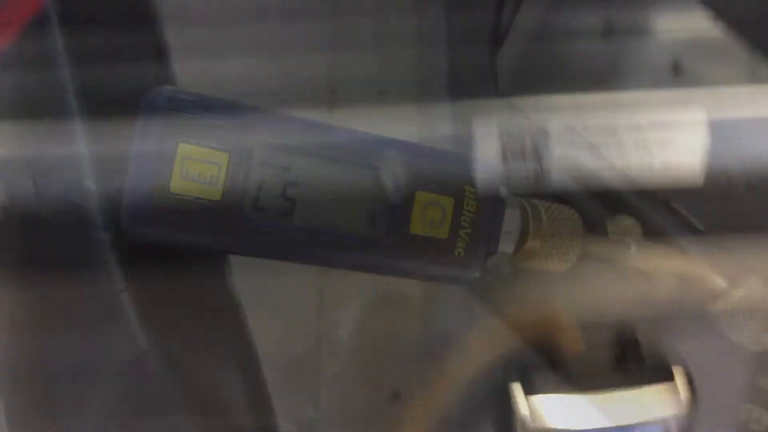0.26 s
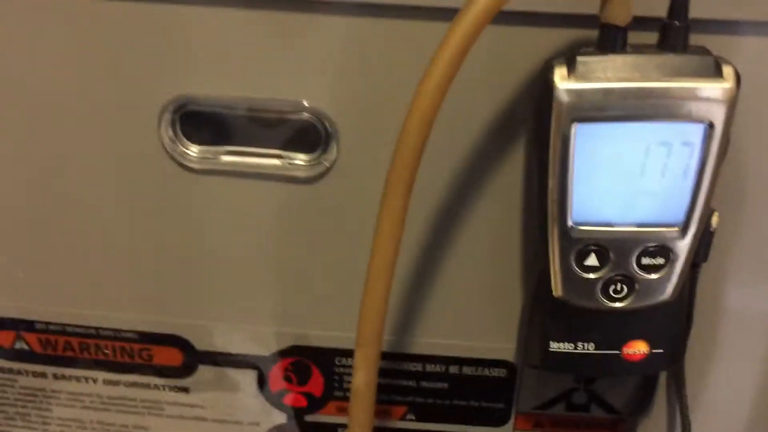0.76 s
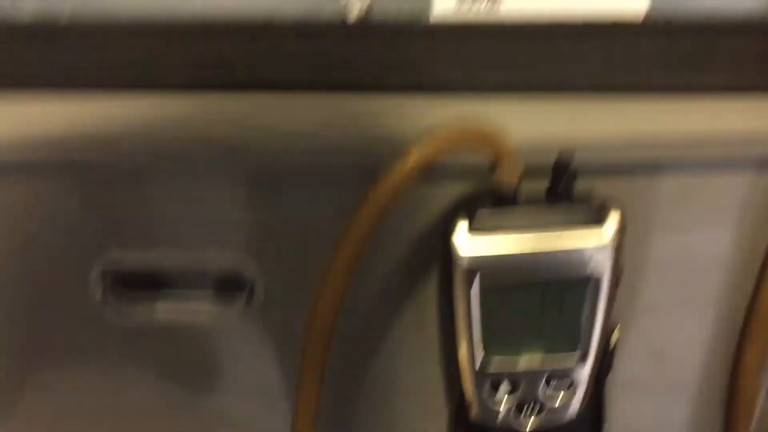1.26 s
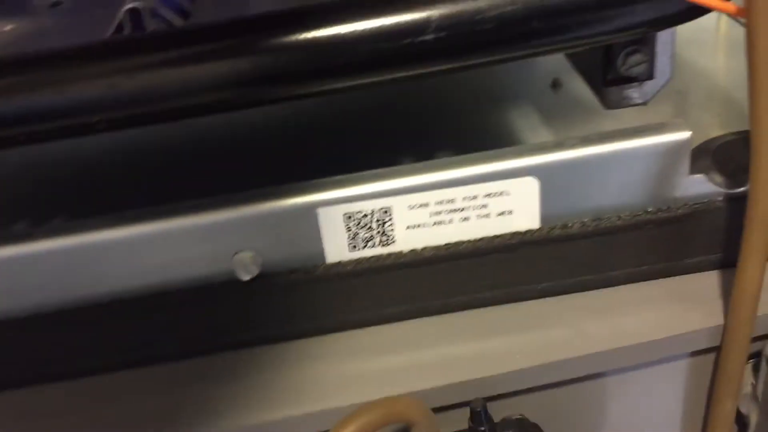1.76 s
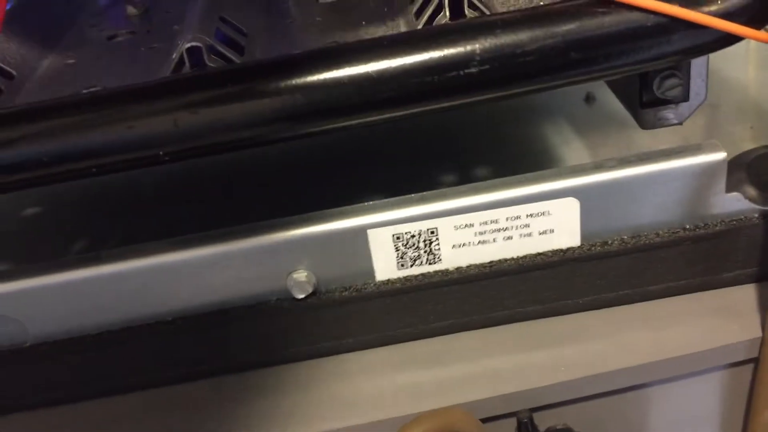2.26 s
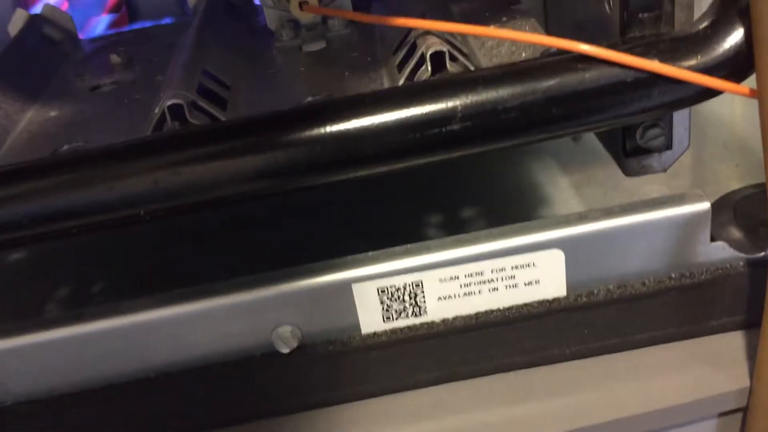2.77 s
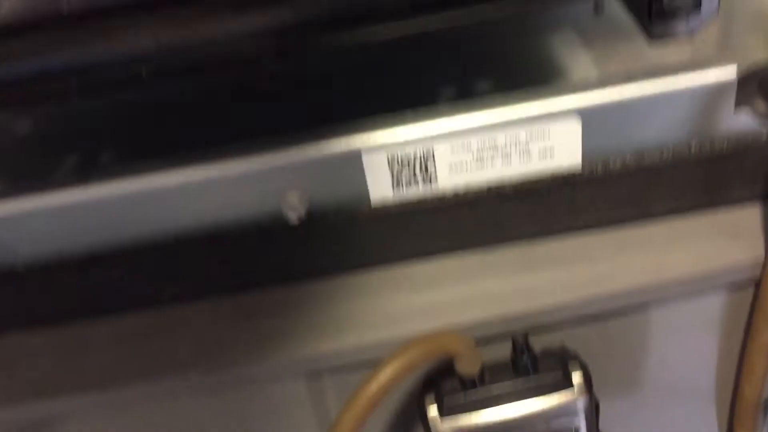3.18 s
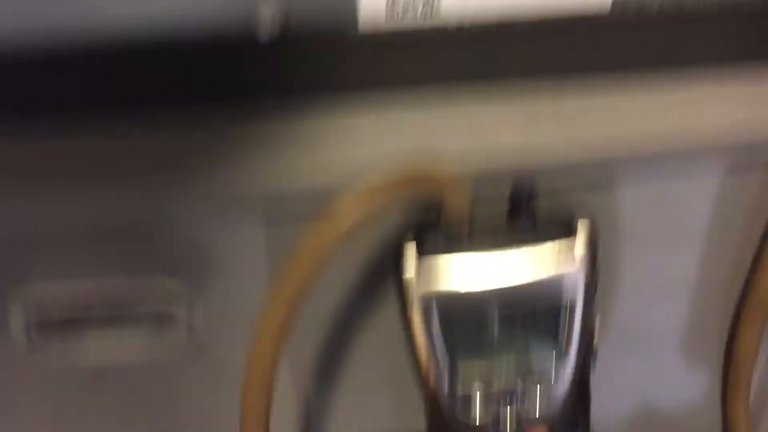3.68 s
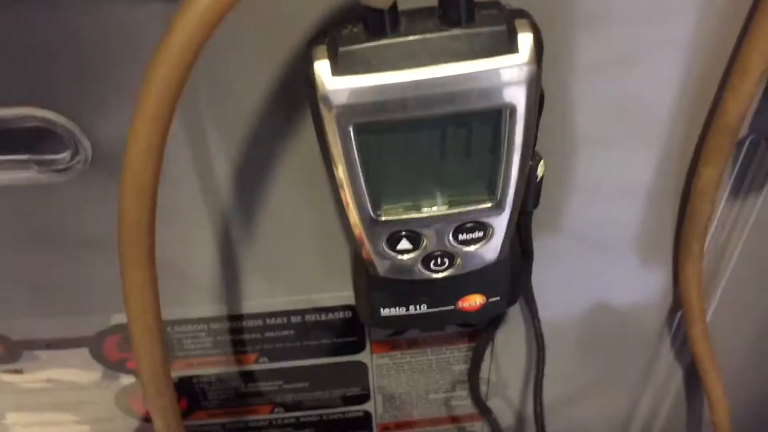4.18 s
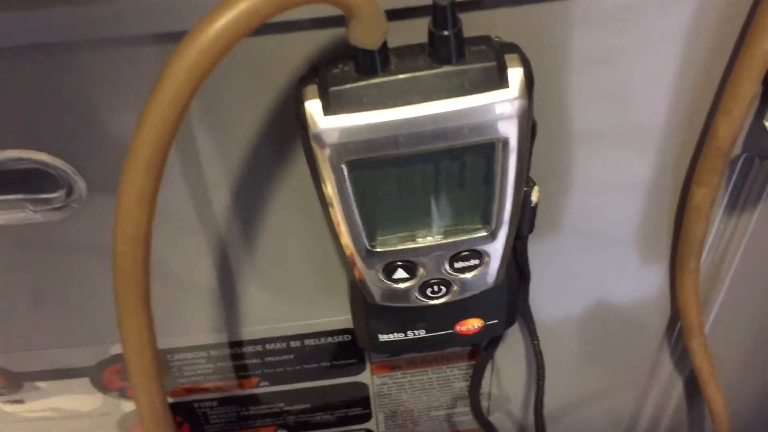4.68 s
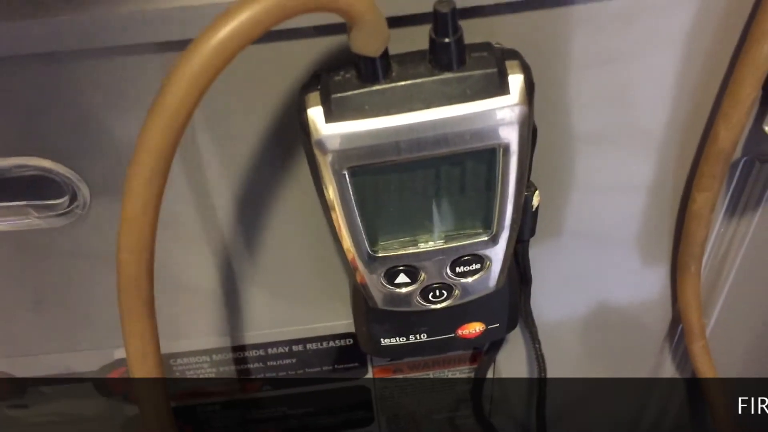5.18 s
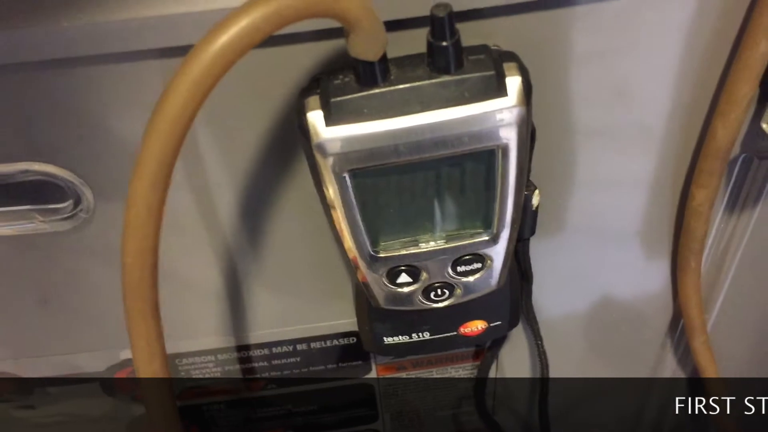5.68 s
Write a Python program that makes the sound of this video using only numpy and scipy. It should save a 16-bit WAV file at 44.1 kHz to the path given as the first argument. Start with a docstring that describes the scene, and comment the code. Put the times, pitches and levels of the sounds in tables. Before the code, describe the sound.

A brief broad machine rush with faint whines fades in under half a second into a running gas furnace. Low flame rumble, duct air, steady thin motor tones and gas hiss continue in a small room. The hand-held phone moves, so the hiss swells and recedes; tiny ticks occur, then sharp plastic taps rattle close by near the end.

```python
"""First a broad rush with a few whines dies away in under half a second while a gas furnace comes up.
In a small room, a hand-held phone moves along the cabinet: nearer the open burner box, more gas hiss.
Shaped noise makes the flame roar, boom, panels, duct air and jets; drifting sines make the draught motor.
Close by, decaying modes ring a tapped plastic gauge and short noise bursts make ticks and scuffs."""
import sys
import numpy as np
from scipy import signal
from scipy.fft import rfft, irfft, next_fast_len
from scipy.io import wavfile
from scipy.ndimage import uniform_filter1d, map_coordinates

SR = 44100
rng = np.random.default_rng(int(sys.argv[2]) if len(sys.argv) > 2 else 0)


def master_out(mix):
    """Clip the mix to full scale and print it as 16-bit PCM to the path in sys.argv[1]."""
    frames = np.transpose(np.atleast_2d(mix))
    ceiling = np.clip(frames, -1, 1)
    pcm = np.round(ceiling * 32767).astype(np.int16)
    wavfile.write(sys.argv[1], SR, pcm)


N = 261689  # length [samples]


def amp(db):
    """Gain of a level in dB."""
    return 10 ** (np.asarray(db) / 20)


def unit(x):
    """x at rms 1."""
    return x / np.sqrt(np.mean(x ** 2) + 1e-20)


def along(points, hz):
    """Value at hz, from (frequency, value) points on a log axis."""
    f, v = np.transpose(points)
    return np.interp(np.log(hz + 1), np.log(f + 1), v)


def curves(rows):
    """One value per sample for each column after the time."""
    s, *cols = np.transpose(rows)
    return [np.interp(np.arange(N) / SR, s, c) for c in cols]


def ramp(start_s, length_s):
    """0 before start, 1 after start + length."""
    return np.clip((np.arange(N) / SR - start_s) / length_s, 0, 1)


def wobble(rate):
    """A smooth random curve, rate knots a second."""
    knots = rng.standard_normal(int(N * rate / SR) + 4)
    return map_coordinates(knots, [np.arange(N) * rate / SR])


def filtered(x, response):
    """x times a response of frequency."""
    m = next_fast_len(len(x) + 8192)
    return irfft(rfft(x, m) * response(np.fft.rfftfreq(m, 1 / SR)), m)[:len(x)]


def lifts(peaks, hz):
    """Resonances as bell-shaped lifts in dB."""
    return sum(db / (1 + (2 * (hz - c) / w) ** 2) for c, w, db in peaks)


def resonant(modes):
    """Gain of steep-sided resonances side by side."""
    def gain(f):
        return np.sqrt(sum(amp(2 * db) / (1 + (2 * (f - c) / w) ** 2) ** 1.87 for c, w, db in modes))
    return gain


def smooth_field(shape, bins, frames):
    """Random values smoothed over frequency bins and time frames, at rms 1."""
    across = uniform_filter1d(rng.standard_normal(shape), size=bins, axis=0)
    return unit(uniform_filter1d(across, size=frames, axis=1))


def rush(gain, patchy_db, comb_db=4.0):
    """Noise of rms 1 coloured by gain(Hz), with brief patches and a fine, slowly shifting comb of room echoes."""
    z = signal.stft(rng.standard_normal(N), nperseg=1024)[2]
    patches = smooth_field(z.shape, bins=10, frames=6)
    comb = smooth_field(z.shape, bins=2, frames=90)
    field = amp(patchy_db * patches + comb_db * comb)
    return unit(filtered(signal.istft(z * field, nperseg=1024)[1][:N], gain))


def tone(hz, waver_hz):
    """A sine of rms 1 whose pitch drifts a little."""
    cycles = np.cumsum(hz + waver_hz * wobble(6.06)) / SR
    return np.sqrt(2) * np.sin(2 * np.pi * (cycles + rng.random()))


# Closeness of the phone to the open burner box as it pans: (time [s], closeness [0-1])
FACING = [(0, 0.74), (.4, 0.82), (.65, 0.02), (1.05, 0.32), (1.6, 0.97), (2.5, 0.86), (3.55, 0.91),
          (4.1, 0.25), (4.6, 0.55), (5.93, 0.25)]
THINS_S, THINNING_S = 5.08, 0.12  # the bass thins and the middle comes forward: start, length


def heard(far_db, close_db, thin_db):
    """Level of a layer: far from the burner, plus the gain close to it, plus the change once the bass thins."""
    return far_db + close_db * curves(FACING)[0] + thin_db * ramp(THINS_S, THINNING_S)


# Firebox resonances: (frequency [Hz], width [Hz], relative level [dB])
FIREBOX = [(132.1, 12.2, 0.5), (159.6, 27.6, -7)]
# Flame roar at the microphone: (time [s], level [dB])
ROAR = [(0, -45), (.6, -43), (1.4, -42), (1.96, -36.5), (2.4, -44.5), (3.3, -38), (4.3, -41), (4.75, -37.5),
        (5.1, -45.5), (5.65, -48.5), (5.93, -39)]


def flame_roar():
    """Flame turbulence excites the firebox resonances."""
    roar_db, = curves(ROAR)
    return amp(roar_db + 0.21 * wobble(2.8)) * rush(resonant(FIREBOX), patchy_db=0.4, comb_db=1.0)


# Spectrum of the flame's boom in the room: (frequency [Hz], relative level [dB per Hz])
BOOM = [(20, -50), (32, -16), (42, -11), (65, 0.5), (90, -5.5), (110, -5), (200, -37), (400, -91)]


def flame_boom():
    """Flame turbulence booms in the room as low noise."""
    level_db = heard(far_db=-46.5, close_db=0, thin_db=-1.5)
    return amp(level_db) * rush(lambda f: amp(along(BOOM, f)), patchy_db=-1.0, comb_db=1.9)


# Cabinet panel resonances: (frequency [Hz], width [Hz], relative level [dB])
PANELS = [(242, 33, 1), (292.4, 78, -2.5), (355, 84, -12.5), (429.4, 49, -12)]


def panels():
    """Flame turbulence shakes the cabinet panels at their resonances."""
    level_db = heard(far_db=-49.5, close_db=2, thin_db=-5.5) + 0.87 * wobble(6)
    return amp(level_db) * rush(resonant(PANELS), patchy_db=0.7, comb_db=-0.4)


# Gas hiss spectrum: (frequency [Hz], relative level [dB per Hz])
GAS = [(1760, -41), (3000, -5), (3530, -1.5), (3930, -3.5), (4880, -5.5), (5400, 2.5), (5910, 1),
       (6670, 3.5), (7790, -6), (8530, -0.5), (11000, -13), (12600, -19.5), (13500, -35), (14500, -45),
       (16400, -51), (22000, -120)]
# Pipes of the gas jets: (frequency [Hz], width [Hz], lift [dB])
JETS = [(4600, 81, 3), (5490, 140, 5), (6540, 150, 4), (6730, 300, 6), (7200, 250, 4.5), (8320, 110, 7),
        (9200, 250, 4), (10020, 120, 4.5), (10360, 80, 4), (10790, 70, 6), (11000, 80, 5), (11300, 200, 3),
        (12320, 120, 5)]


def gas_hiss():
    """Gas hisses through the jets, whose pipes lift narrow bands; it gains most close to the burner."""
    level_db = heard(far_db=-67, close_db=7.5, thin_db=1) + 0.58 * wobble(4.2)
    return amp(level_db) * rush(lambda f: amp(along(GAS, f) + lifts(JETS, f)), patchy_db=1.28, comb_db=3)


# Narrow bands of top hiss: (frequency [Hz], width [Hz], relative level [dB])
WHISTLE = [(12930, 200, 0), (13200, 300, -4), (13720, 90, -4), (13990, 120, -4)]
WHISTLE_RAMP_S = 0.25


def top_whistle():
    """Narrow top hiss, faint but lifted while the phone is in line with the jets; at first the same bands sound
    with the other machine's dying rush."""
    in_line = ramp(1.25, WHISTLE_RAMP_S) - ramp(3.6, WHISTLE_RAMP_S)
    at_first = 1 - ramp(0.3, WHISTLE_RAMP_S)
    return amp(-92 + 13 * in_line + 10 * at_first) * rush(resonant(WHISTLE), patchy_db=1, comb_db=2)


# Rushing air spectrum: (frequency [Hz], relative level [dB per Hz])
AIRFLOW = [(210, -65), (350, -27), (480, -8.5), (550, -6.5), (640, -10.5), (800, -11.5), (1000, -12),
           (1200, -15), (1400, -14.5), (1820, -22), (2350, -25.5), (3740, -35), (5000, -40), (8000, -89)]
# Duct resonances: (frequency [Hz], width [Hz], lift [dB])
DUCT = [(545, 30, 3), (690, 45, 6), (965, 80, 7), (1330, 80, 3)]


def duct_air():
    """Air rushes in the duct, whose resonances lift a few bands."""
    level_db = heard(far_db=-57, close_db=1, thin_db=3.5)
    return amp(level_db) * rush(lambda f: amp(along(AIRFLOW, f) + lifts(DUCT, f)), patchy_db=.9, comb_db=1.6)


# Draught motor: (frequency [Hz], level re its TONES column [dB], pitch waver [Hz], TONES column [0-2])
MOTOR = [(528.4, 0, 1, 0), (665.6, 0, .5, 1), (711.8, 0, .3, 2), (832, -18, .6, 2), (954, -15, .6, 2),
         (1057, -15, .8, 0), (1088, -16, 1, 2)]
# Motor tones as the phone moves through the room's standing waves:
# (time [s], low level [dB], middle level [dB], top level [dB])
TONES = [(0, -58, -61, -59), (.5, -59.5, -63.5, -58.5), (1.2, -59.5, -62.5, -60), (1.8, -59, -63, -56.5),
         (3.3, -58, -62.5, -56), (4, -57, -62, -56), (4.8, -57, -63.5, -57), (5.25, -57.5, -58.5, -54.5),
         (5.93, -57, -56.5, -55)]


def motor():
    """Three thin tones and weaker ones beside them; the room swells each group as the phone moves."""
    level_db = curves(TONES)
    return sum(amp(level_db[k] + db + .8 * wobble(5)) * tone(hz, waver) for hz, db, waver, k in MOTOR)


# Narrow airy rings of the cabinet: (frequency [Hz], width [Hz])
RINGS = [(2015, 50), (2580, 80), (3740, 190)]
# Rings as the phone moves: (time [s], low level [dB], middle level [dB], top level [dB])
RING_LEVELS = [(0, -80, -86, -79), (.6, -76, -87, -80), (1.2, -74, -87, -76), (2, -74, -85, -80),
               (3.5, -77, -84, -79), (4.2, -85, -85, -78), (4.8, -81, -77, -76), (5.93, -80, -79, -78)]


def rings():
    """Air sings faintly in three narrow resonances, each swelling on its own."""
    return sum(amp(level_db) * rush(resonant([(hz, width, 0)]), patchy_db=2.1, comb_db=-0.5)
               for (hz, width), level_db in zip(RINGS, curves(RING_LEVELS)))


# Taps on the gauge, before room and microphone: (time [s], peak level [dB], brightness [dB per octave],
# damping [factor], hollow body level [dB], attack time constant [s], hard contact level [dB])
TAPS = [(5.133, -46.5, 12, 0.58, -10, .0003, 14), (5.238, -37, -11, 2.1, -11, .002, -10),
        (5.242, -14, 6, 1.6, -9, 0.00011, 21), (5.2443, -19.5, -0.5, 1.18, 5, 0.00017, 5),
        (5.2456, -28, 2, 2, -12, 0.00015, 9), (5.254, -32, -5, 1.1, -9, 0.00049, 0),
        (5.398, -45, -1, 1, -16, .003, -10), (5.4068, -25, 1.5, 1.9, -13, 0.0015, -3),
        (5.4114, -33, -8, 0.7, -11, .0005, 3), (5.422, -36.5, 3, 0.88, -5, .0015, 7),
        (5.463, -38.5, -17, 1, -26, 0.0014, -5), (5.468, -46, 11, 1.6, -12, 0.00088, 0)]
# Modes of the plastic case: (frequency [Hz], relative level [dB], 60 dB decay at damping 1 [s])
GAUGE = [(972, -14, 0.14), (1333, -13, 0.14), (1450, -5, 0.057), (1540, -4.5, 0.05), (2090, 3, 0.045),
         (2167, -0.5, 0.03), (2280, -2, 0.033), (2500, -13, 0.092), (2775, 4.5, 0.034), (3080, -3.5, 0.05),
         (3150, -12, 0.034), (3760, -15, 0.029), (3822, -12, 0.033), (3966, 0.5, 0.028), (4320, -4, 0.024),
         (4640, 2.5, 0.022), (5000, -7, 0.047), (5380, -10, 0.066), (5720, -16, 0.073), (6260, -9, 0.067),
         (7110, -17, 0.089), (9100, -50, 0.028)]
BODY_HZ, BODY_RISE_S = 1700, 0.0043  # modes below this are the hollow body, which wakes slowly
RATTLE, RATTLE_HZ = 0.094, 200  # depth and speed of the loose parts' buzz
SNAP_HZ, SNAP_T60_S = 4220, 0.0017  # the hard first contact
STRIKE_SCATTER_DB, PHASE_SCATTER = 1.5, .06  # change from blow to blow: dB, cycles


def gauge():
    """Each tap rings the case modes at new strengths, with a crack and rattling tail; the hollow body follows."""
    out, t = np.zeros(N + SR), np.arange(SR // 5) / SR
    hz, level_db, t60 = np.transpose(GAUGE)[:, :, None]
    low = hz[:, 0] < BODY_HZ
    for s, db, tilt_db, damping, body_db, attack, snap_db in TAPS:
        scatter_db = STRIKE_SCATTER_DB * rng.standard_normal(hz.shape)
        strike_db = level_db + tilt_db * np.log2(hz / 2500) + scatter_db
        cycles = hz * t + PHASE_SCATTER * rng.standard_normal(hz.shape)
        modes = amp(strike_db - 60 * t * damping / t60) * np.sin(2 * np.pi * cycles)
        body = amp(body_db) * (1 - np.exp(-t / BODY_RISE_S)) * modes[low].sum(axis=0)
        buzz = filtered(rng.standard_normal(len(t)), lambda f: np.exp(-(f / RATTLE_HZ) ** 2))
        rattle = 1 + RATTLE * unit(buzz)
        noise = filtered(rng.standard_normal(len(t)),
                         lambda f: (f / 3800) ** 1.9 / (1 + (f / 3800) ** 3.66))
        snap = amp(snap_db - 60 * t / SNAP_T60_S) * np.sin(2 * np.pi * SNAP_HZ * t)
        # the crack's noise dies quickly, over a weaker and longer tail
        noise_decay = .9 * amp(-60 * t / 0.0094) + 0.27 * amp(-60 * t * damping / 0.14)
        crack = snap + noise_decay * unit(noise)
        tap = (1 - np.exp(-t / attack)) * (modes[~low].sum(axis=0) * rattle + crack) + body
        out[round(s * SR):][:len(t)] += amp(db) * tap / np.abs(tap).max()
    return out[:N]


# Small ticks and scuffs, before room and microphone:
# (time [s], level [dB], centre [Hz], width [octaves], decay constant [s])
TICKS = [(0.288, -67, 3600, .2, 0.013), (0.37, -58.5, 6500, .9, .008), (0.519, -54.5, 2300, 0.41, 0.0076),
         (0.644, -64, 2490, 0.45, 0.037), (1.693, -50.5, 6000, 0.78, 0.014),
         (2.294, -62.5, 2400, 0.6, 0.041), (2.6545, -47, 3560, 1.7, 0.012), (2.942, -62, 2700, 0.36, 0.032),
         (3.055, -45, 6000, 1, 0.0087), (3.47, -63, 3000, 1, 0.016), (4.718, -50, 952, 0.031, 0.032),
         (5.84, -56.5, 2200, 0.55, 0.045)]
# The phone case colours each tick: (frequency [Hz], width [Hz], lift [dB])
CASE = [(2800, 600, 2), (5300, 500, 5), (7100, 600, 4), (9000, 500, 5), (11200, 400, 7), (14500, 3000, -6)]
TICK_COLOUR_DB, TICK_GRAIN_DB = 2.5, 3  # chance resonances and crackle of a tick


def ticks():
    """Short uneven noise bursts, each with its own colour and a few chance resonances."""
    out, t = np.zeros(N + SR), np.arange(SR // 5) / SR
    for s, db, hz, octaves, length in TICKS:
        bumps = rng.standard_normal(60)

        def colour(f):
            band = np.exp(-.5 * (np.log2((f + 1) / hz) / octaves) ** 2)
            chance = np.interp(f, np.linspace(0, SR / 2, len(bumps)), bumps)
            return band * amp(lifts(CASE, f) + TICK_COLOUR_DB * chance)

        shape = (1 - np.exp(-t / (.04 * length))) * np.exp(-(t / length) ** 1.2)
        grain = unit(uniform_filter1d(rng.standard_normal(len(t)), size=40))
        burst = unit(filtered(rng.standard_normal(len(t)), colour))
        out[round(s * SR):][:len(t)] += amp(db) * shape * amp(TICK_GRAIN_DB * grain) * burst
    return out[:N]


# The other machine's rush: (frequency [Hz], relative level [dB per Hz])
FADING_NOISE = [(25, -28), (60, 4.5), (110, -0.5), (200, -1), (400, -3.5), (515, -7.5), (928, -8.5),
                (1420, -15), (2300, -17), (3200, -25), (6400, -31.5), (12400, -39.5), (13000, -46),
                (14200, -52), (15000, -57)]
# Its whines: (frequency [Hz], level re its rush [dB])
FADING_TONES = [(925, -14), (2380, -24), (4080, -33), (4503, -27), (4548, -28), (5025, -30)]
CROSSFADE_S, FADING_HOLD_S = 0.37, 0.076  # both fades end; the other machine begins to fade


def other_machine():
    """A broader rush with a few whines that dies away."""
    whines = sum(amp(db) * tone(hz, 1.4) for hz, db in FADING_TONES)
    noise = rush(lambda f: amp(along(FADING_NOISE, f)), patchy_db=1.2, comb_db=1.5)
    fade = 1 - ramp(FADING_HOLD_S, CROSSFADE_S - FADING_HOLD_S)
    return amp(-45.5) * fade * (noise + whines)


ROOM_DB, ROOM_T60_S, ROOM_HZ = -15.5, 0.18, 1990  # answer to close knocks: level, decay, dull above


def room(x):
    """x with a short dull tail of reflections."""
    t = np.arange(SR // 3) / SR
    dull = filtered(rng.standard_normal(len(t)), lambda f: 1 / (1 + (f / ROOM_HZ) ** 2))
    tail = dull * amp(-60 * t / ROOM_T60_S)
    return x + amp(ROOM_DB) * signal.fftconvolve(x, tail / np.linalg.norm(tail))[:N]


# The phone's answer to close knocks: (frequency [Hz], level [dB])
CLOSE = [(500, 0), (850, 1.5), (1300, 4), (6000, -2), (9000, -3.5), (12500, -8.5), (15000, -4), (16000, -8)]


def scene():
    """All sources at the one microphone; the furnace rises by 4 dB as the other machine fades."""
    close = filtered(room(gauge() + ticks()), lambda f: amp(along(CLOSE, f)))
    burner = flame_roar() + flame_boom() + panels() + duct_air() + gas_hiss() + top_whistle()
    fade_in = amp(-4 * (1 - ramp(0, CROSSFADE_S)))
    return (fade_in * (burner + rings() + motor()) + other_machine() + close)[None]


TOP_HZ = 15750  # the phone's band limit


def record(dry):
    """The microphone adds a faint high hiss of its own; the phone keeps nothing above its band limit."""
    white = amp(-78.0) * rng.standard_normal(N)
    hiss = filtered(white, lambda hz: 1 / (1 + (9000 / (hz + 1)) ** 4))
    return filtered(dry[0] + hiss, lambda hz: hz < TOP_HZ)[None]


dry = scene()
out = record(dry)
master_out(out)
```